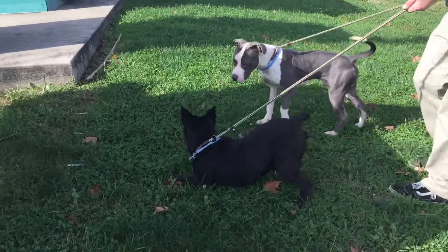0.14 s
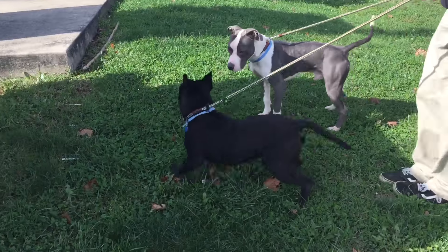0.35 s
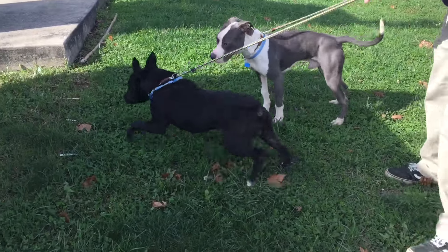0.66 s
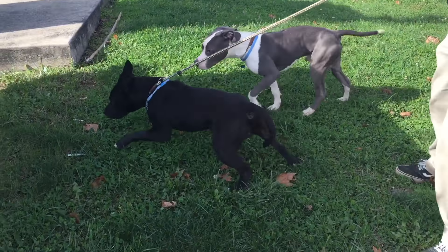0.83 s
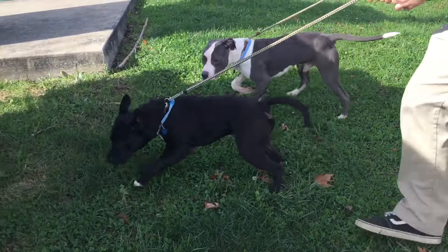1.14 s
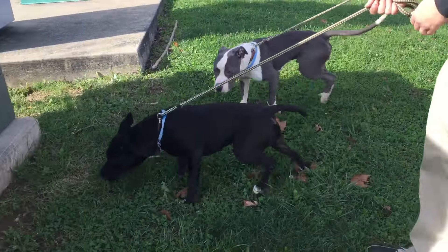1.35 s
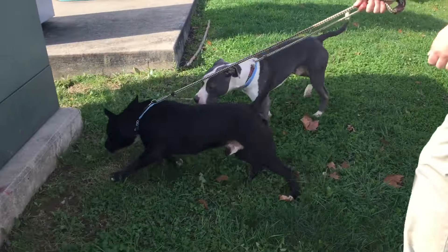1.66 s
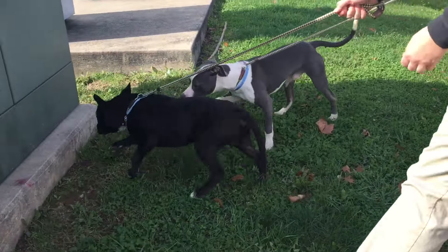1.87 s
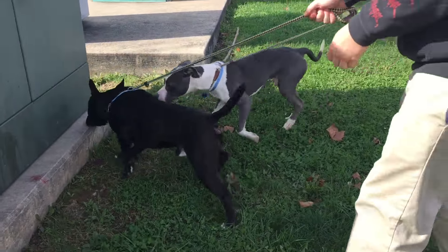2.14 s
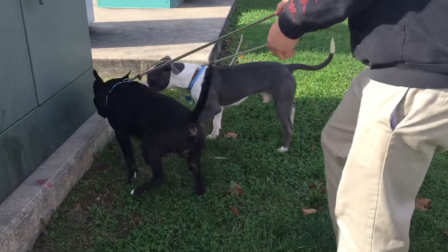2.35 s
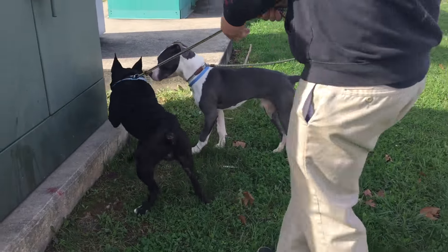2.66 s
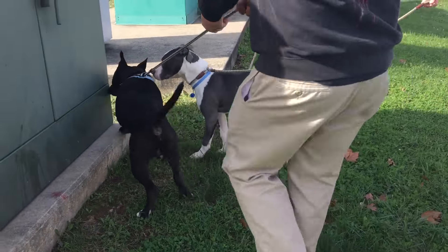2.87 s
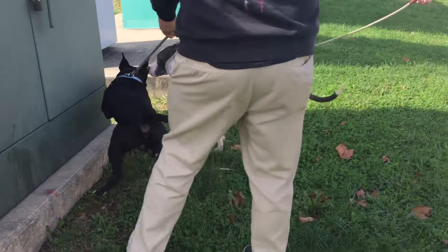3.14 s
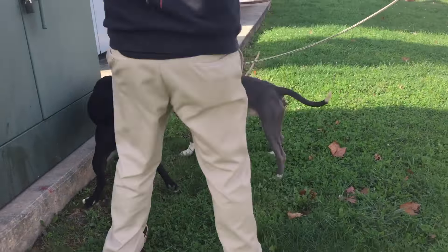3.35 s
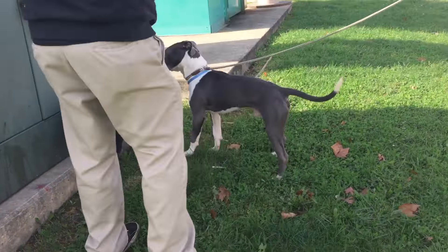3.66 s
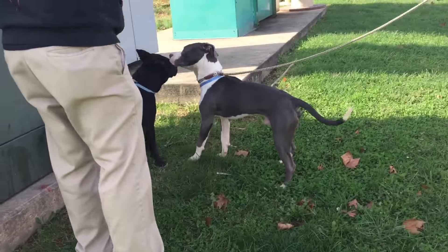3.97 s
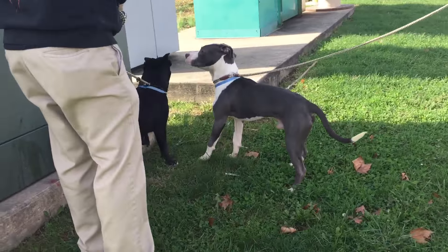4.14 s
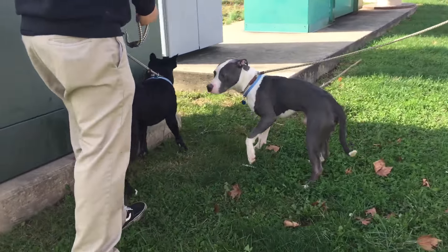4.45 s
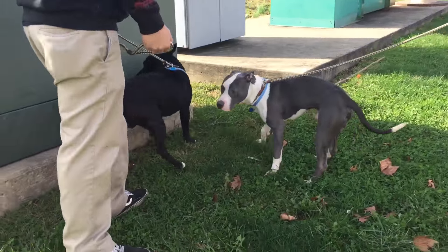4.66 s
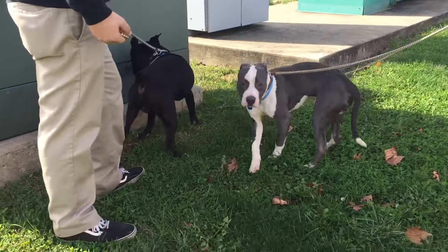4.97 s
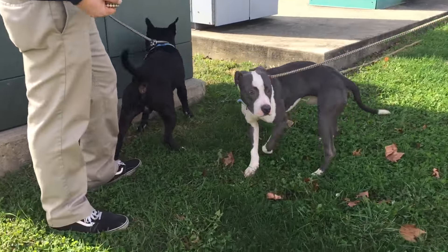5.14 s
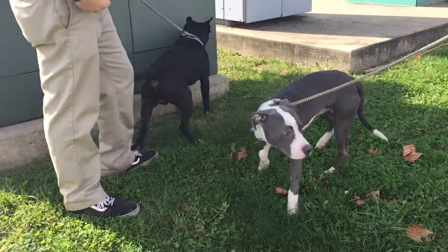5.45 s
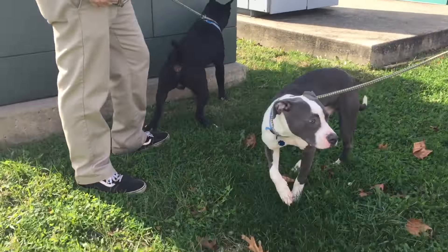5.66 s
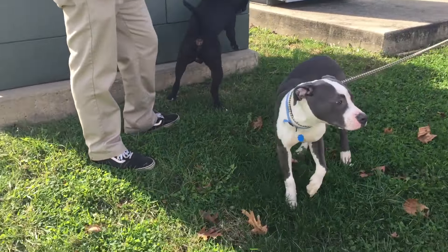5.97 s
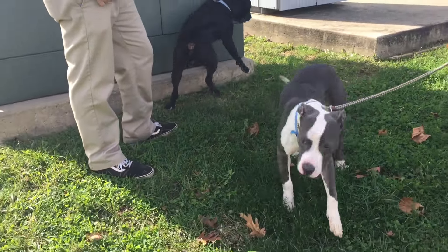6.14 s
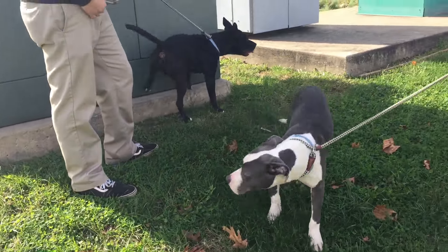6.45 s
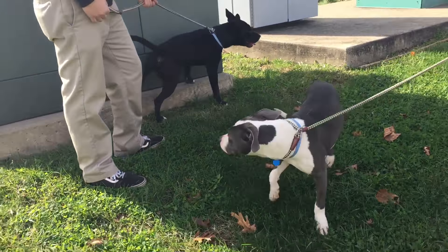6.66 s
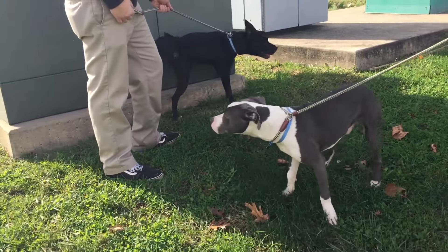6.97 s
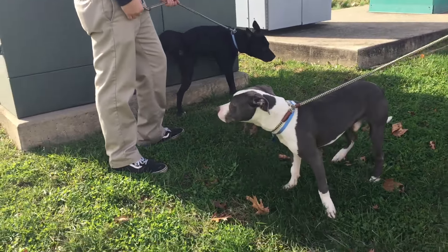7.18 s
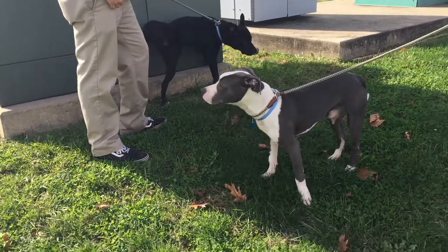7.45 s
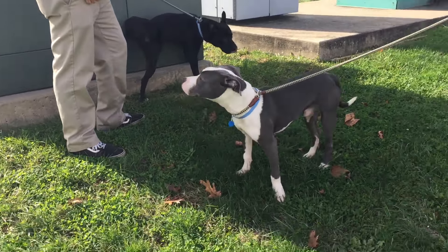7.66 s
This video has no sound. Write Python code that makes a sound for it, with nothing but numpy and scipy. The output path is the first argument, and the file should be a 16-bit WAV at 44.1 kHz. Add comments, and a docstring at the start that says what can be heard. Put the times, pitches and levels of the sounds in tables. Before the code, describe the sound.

A quick flurry of grass rustling and sharp ticks close by, then a deep engine starts across the lawn, revs up within a second and settles slightly lower into a pulsing drone. Another deep hum swells underneath. Far traffic and stirring leaves fill the background, with scattered paw steps, tiny metal chinks, thin faint whistles and one shoe scuff later, all caught by one outdoor microphone.

```python
"""Traffic roars far away and a second machine hums, climbing slowly: band-shaped noise and wavering sines.
Then a big eight-cylinder engine catches some way off across a lawn, revs up and settles to an uneven idle:
orders of its cycle plus pulsing exhaust noise. Close by, paws and shoes rustle in the grass (crackly hiss),
leads tick and collar tags chink (struck modes), leaves stir in a breeze and faint whistles rise."""
import sys
import numpy as np
from scipy import signal
from scipy.fft import rfft, irfft, next_fast_len
from scipy.io import wavfile
from scipy.ndimage import uniform_filter1d, map_coordinates

SR = 44100
rng = np.random.default_rng(int(sys.argv[2]) if len(sys.argv) > 2 else 0)


def waveform_to_disk(signal):
    """Save audio, clipped to [-1, 1], as 16-bit WAV at the path in sys.argv[1]."""
    frames = np.transpose(np.atleast_2d(signal))
    scaled = np.clip(frames, -1, 1) * 32767
    samples = np.round(scaled).astype(np.int16)
    wavfile.write(sys.argv[1], SR, samples)


def rack_gain(trim_db):
    """Turn a fader trim in dB into the linear factor to multiply a signal by."""
    fader = np.asarray(trim_db, float)
    return 10 ** (fader / 20)


N = 344553
T = np.arange(N) / SR


def unit(x):
    """Scaled to rms 1."""
    return x / np.sqrt(np.mean(x ** 2) + 1e-20)


def curves(rows):
    """One value per sample for each column after the time."""
    t_s, *columns = np.transpose(rows)
    return [np.interp(T, t_s, column) for column in columns]


def wobble(rate_hz):
    """A smooth random curve, rate_hz knots a second."""
    knots = rng.standard_normal(int(N * rate_hz / SR) + 4)
    return map_coordinates(knots, [T * rate_hz])


def coloured(x, spectrum):
    """x shaped through the (f/Hz, level/dB) points, straight in log frequency, rms 1."""
    size = next_fast_len(N + 8192)
    f_hz, level_db = np.transpose(spectrum)
    log_bins = np.log(np.fft.rfftfreq(size, 1 / SR) + 1)
    gain_db = np.interp(log_bins, np.log(f_hz), level_db, left=-120, right=-120)
    return unit(irfft(rfft(x, size) * rack_gain(gain_db), size)[:N])


def tone(cycles, rms_db):
    """A sine of the given level along a running count of cycles, random start phase."""
    return np.sqrt(2) * rack_gain(rms_db) * np.sin(2 * np.pi * (cycles + rng.random()))


def ring(f_hz, t60_s, t):
    """One struck mode."""
    return rack_gain(-60 * t / t60_s) * np.sin(2 * np.pi * f_hz * t)


def swell(start_s, length_s):
    """A rounded rise and fall."""
    return np.sqrt(np.clip(1 - (2 * (T - start_s) / length_s - 1) ** 2, 0, 1))


def patchy(depth_db):
    """Noise whose gain drifts in patches of time and frequency."""
    z = signal.stft(rng.standard_normal(N), nperseg=512)[2]
    across_f = uniform_filter1d(rng.standard_normal(z.shape), size=6, axis=0)
    field = uniform_filter1d(across_f, size=12, axis=1)
    return signal.istft(z * rack_gain(depth_db * unit(field)), nperseg=512)[1][:N]


def crackly(share):
    """Hiss with crackles of widely spread size, about 900 a second."""
    struck = rng.random(N) < 900 / SR
    crackle = struck * rng.choice([-1, 1], N) * rack_gain(4.5 * rng.standard_normal(N))
    return patchy(depth_db=2.0) + share * unit(crackle)


# tyre roar level: t/s, level/dB
ROAR_LEVEL = [(0, -41.5), (.65, -46), (1.2, -42), (1.76, -43), (2.3, -38), (2.5, -39), (2.9, -41.5),
              (3.46, -40), (3.75, -42), (5.05, -41.5), (6.05, -40), (6.4, -41.5), (6.9, -39), (7.81, -38)]
# tyre roar spectrum: f/Hz, level/dB per Hz
ROAR_SPECTRUM = [(220, -27), (380, 0), (496, -8), (979, -3.5), (2150, -9), (2830, -16.5), (3450, -16.5),
                 (4930, -31.5), (6000, -40.5), (7800, -62.5), (13200, -120)]


def traffic():
    """Far tyre roar: patchy noise, mostly below 4 kHz."""
    roar_db, = curves(ROAR_LEVEL)
    return rack_gain(roar_db + 0.32 * wobble(5.2)) * coloured(patchy(depth_db=0.92), ROAR_SPECTRUM)


# breeze strength: t/s, level/dB
BREEZE_LEVEL = [(0, -52), (.6, -72.5), (1, -53), (1.8, -64), (2.3, -48), (2.9, -51), (3.3, -51.5),
                (3.8, -53), (4.3, -50), (4.6, -58), (4.95, -54), (5.3, -52.5), (6.5, -54), (7.2, -51),
                (7.81, -52)]
# leaf noise spectrum: f/Hz, level/dB per Hz
LEAF_SPECTRUM = [(1500, -14.5), (2800, -0.5), (4000, -6.5), (6000, -6), (9000, -14.5), (11500, -26),
                 (15600, -32.5)]


def breeze():
    """Leaves in the breeze: patchy hiss that swells and sinks."""
    leaves_db, = curves(BREEZE_LEVEL)
    return rack_gain(leaves_db + 0.8 * wobble(7)) * coloured(patchy(depth_db=2.5), LEAF_SPECTRUM)


# low exhaust noise spectrum: f/Hz, level/dB per Hz
RUMBLE_SPECTRUM = [(30, -27.5), (45, -9.5), (70, -2), (140, 2.5), (220, 0.5), (330, -11), (450, -28.5),
                   (700, -51.5)]
RUMBLE_DB, RUMBLE_WAVER_DB = -34, 3


def exhaust_rumble():
    """The low noisy part of the exhausts, building up at first."""
    build_up_db = -2.6 * np.exp(-T / 0.5)
    level_db = RUMBLE_DB + build_up_db + RUMBLE_WAVER_DB * wobble(2.577)
    return rack_gain(level_db) * coloured(rng.standard_normal(N), RUMBLE_SPECTRUM)


# restless grass between steps: t/s, level/dB
RESTLESS_LEVEL = [(0, -57.5), (1.1, -60.5), (1.6, -53), (2, -56.5), (2.3, -54), (2.66, -54), (2.72, -62),
                  (3, -62.5), (3.35, -54.5), (3.6, -63.5), (4.3, -61), (4.6, -76), (5, -58), (5.4, -68.5),
                  (6.8, -73.5), (7.3, -57), (7.65, -70)]
# paws and shoes brushing through: start t/s, hold/s, level/dB
BRUSHES = [(.12, 0.058, -63), (0.289, .055, -41), (0.339, 0.048, -44), (0.498, 0.014, -56.5),
           (0.571, 0.058, -50), (0.758, 0.066, -54.5), (0.854, 0.049, -61), (0.997, 0.068, -52),
           (1.178, 0.021, -54.5), (1.295, 0.033, -45), (1.529, 0.046, -52), (1.763, 0.034, -57),
           (1.915, 0.023, -59), (2.042, 0.089, -51.5), (2.242, 0.023, -48.5), (2.415, 0.047, -51.5),
           (2.51, 0.12, -53.5), (2.75, 0.03, -55.5), (4.378, 0.014, -43.5), (4.42, .03, -60.5),
           (4.714, 0.033, -64.5), (5.421, 0.011, -55), (6.05, 0.047, -52), (6.125, 0.065, -54.5),
           (6.31, .05, -64.5), (6.879, 0.018, -54), (7.022, 0.018, -58), (7.199, .11, -61),
           (7.352, .08, -59.5)]
# blade noise spectrum: f/Hz, level/dB per Hz
GRASS_SPECTRUM = [(800, -30), (2000, -3.5), (4000, -2), (7000, 2.5), (10300, -2), (13000, -3.5),
                  (15600, -9.5)]
# both scale with hold: a long brush rises and fades more slowly
BEND_SHARE, SPRING_DB_PER_HOLD = 0.37, 17.5


def grass():
    """Blades bend under paws and shoes, then spring back: crackly hiss gated by each brush."""
    restless_db, = curves(RESTLESS_LEVEL)
    level = rack_gain(restless_db + 1.3 * wobble(9))
    for start_s, hold_s, level_db in BRUSHES:
        holds = (T - start_s) / hold_s
        bend = np.clip(holds / BEND_SHARE, 0, 1)
        spring_back = rack_gain(-SPRING_DB_PER_HOLD * np.maximum(holds - 1, 0))
        level = level + rack_gain(level_db) * bend * spring_back
    return level * rack_gain(1.3 * wobble(40)) * coloured(crackly(share=0.75), GRASS_SPECTRUM)


# dragged shoes: t/s, length/s, f/Hz, width/Hz, level/dB at the top of the swell
SHOE_DRAGS = [(0.29, 0.16, 2100, 1400, -46.5), (6.068, .33, 1350, 448.5, -42.5)]


def scuffs():
    """A dragged shoe: crackly noise peaked at a colour of its own."""
    out = np.zeros(N)
    for start_s, length_s, f_hz, width_hz, level_db in SHOE_DRAGS:
        spectrum = [(f_hz - width_hz, -15), (f_hz, 0), (f_hz + width_hz, -10), (3 * f_hz, -40)]
        out += rack_gain(level_db) * swell(start_s, length_s) ** 2 * coloured(crackly(share=0.55), spectrum)
    return out


# faint thin whistles: t/s, length/s, f/Hz at the start, level/dB at the top of the swell
WHISTLE_NOTES = [(3.257, 0.21, 6633, -58), (3.39, .17, 3970, -55.5), (4.997, 0.047, 14590, -66)]


def whistles():
    """Short sines, rising a little."""
    out = np.zeros(N)
    for start_s, length_s, f_hz, level_db in WHISTLE_NOTES:
        cycles = f_hz * (T + 0.037 * (T - start_s) ** 2)
        out += tone(cycles, level_db) * swell(start_s, length_s) ** 2
    return out


# clips and twigs: t/s, level/dB, f/Hz
TICK_HITS = [(0.0797, -43, 4570), (0.2758, -42.5, 5910), (0.3083, -29.5, 4150), (0.3264, -32.5, 4600),
             (0.3874, -26, 5600), (0.5062, -50, 4470), (0.588, -45, 4270), (1.1916, -43.5, 4320),
             (1.297, -38.5, 4863), (1.4967, -39, 4682), (1.556, -37, 6200), (1.5808, -36.5, 4790),
             (2.2538, -32.5, 5420), (2.558, -37, 4020), (3.9064, -35.5, 5620), (4.383, -29.5, 6540),
             (4.7461, -40.5, 4030), (5.4314, -39, 4200), (5.81, -44, 4380), (6.8879, -40.5, 4498),
             (7.0307, -41.5, 4674)]


def ticks():
    """Dry ticks of clips and twigs: one mode and a noise burst, both dead in about 10 ms."""
    out, t = np.zeros(N + SR), np.arange(SR // 10) / SR
    for start_s, level_db, f_hz in TICK_HITS:
        burst = rack_gain(-60 * t / 0.0099) * rng.standard_normal(len(t))
        tick = 0.84 * ring(f_hz, 0.01, t) + 0.29 * burst
        out[round(start_s * SR):][:len(t)] += rack_gain(level_db) * tick
    return out[:N]


# collar tag hits: t/s, level/dB
TAG_HITS = [(0.0378, -64), (0.0818, -47), (1.2734, -39.5), (1.6318, -40), (5.3272, -50), (5.4792, -60),
            (5.667, -62)]
# tag modes: f/Hz, level/dB, t60/s
TAG_MODES = [(13180, 2, .06), (12500, -24, .04), (7900, -2, .03)]


def tag_chinks():
    """Small metal tags: high modes with a soft 1.5 ms onset."""
    out, t = np.zeros(N + SR), np.arange(SR // 10) / SR
    onset = 1 - np.exp(-t / 0.0015)
    chink = onset * sum(rack_gain(mode_db) * ring(f_hz, t60_s, t) for f_hz, mode_db, t60_s in TAG_MODES)
    for start_s, level_db in TAG_HITS:
        out[round(start_s * SR):][:len(t)] += rack_gain(level_db) * chink
    return out[:N]


# second machine, climbing and growing louder: t/s, f/Hz, level/dB
HUM_PITCH = [(0, 57.3, -33), (.4, 57.94, -57), (.7, 57.6, -40), (1.8, 60.24, -35), (2.3, 60.85, -26),
             (2.6, 60.7, -34), (2.9, 61.8, -32), (3.4, 62, -32), (4, 63.9, -36), (4.2, 63.84, -25.5),
             (4.6, 63.6, -29), (4.9, 63.4, -19), (5.2, 63.88, -23.5), (5.4, 63.9, -20), (6.05, 63.75, -18),
             (6.4, 64.6, -31.5), (6.6, 65.23, -19), (7, 65.4, -21.5), (7.3, 65.87, -28.5),
             (7.81, 64.45, -19)]
# thin tone near the firing note: t/s, f/Hz, level/dB
THIN_TONE = [(1.3, 133.4, -70), (1.9, 134.3, -23.5), (2.4, 132.7, -38), (3.5, 137.4, -26.5),
             (3.9, 138, -32), (4.7, 140.7, -43.5), (5.3, 140.3, -29), (6.3, 139.8, -33),
             (7.8, 148.9, -40.5)]
# the octave keeps its own level once it has set in
OCTAVE_DB, OCTAVE_WAVER_DB, OCTAVE_FROM_S = -35, 2.5, 0.54


def hum():
    """The second machine: a note and its octave, with a thin tone beside them."""
    pitch_hz, note_db = curves(HUM_PITCH)
    thin_hz, thin_db = curves(THIN_TONE)
    cycles = np.cumsum(pitch_hz) / SR
    octave = tone(2 * cycles, OCTAVE_DB + OCTAVE_WAVER_DB * wobble(4.5))
    octave_fade_in = np.clip((T - OCTAVE_FROM_S) / 0.3, 0, 1)
    thin = tone(np.cumsum(thin_hz) / SR, thin_db)
    return tone(cycles, note_db) + octave * octave_fade_in + thin


# engine catches, overshoots, sags to idle: t/s, firing note f/Hz
FIRING_NOTE = [(.3, 74.4), (.44, 92.88), (.58, 123.3), (.72, 134.2), (.9, 137.9), (1.2, 141.8),
               (2.3, 141.1), (2.7, 139.4), (3.1, 135.9), (3.5, 131.9), (3.9, 129.9), (4.5, 128.8),
               (4.8, 130.4), (5.1, 133), (5.5, 131.3), (6.3, 132.3), (6.7, 130.8), (7.81, 128.8)]
# throb of the firing note: t/s, level/dB
FIRING_LEVEL = [(.32, -29.5), (.38, -40), (.44, -21.5), (.52, -17), (.59, -23), (.65, -18), (.71, -27.5),
                (.8, -21.5), (.95, -27), (1.1, -23.5), (1.2, -13), (1.35, -14), (1.5, -23), (1.9, -25.5),
                (2.1, -13.5), (2.35, -16), (2.5, -20.5), (2.7, -11.5), (2.9, -20.5), (3, -11), (3.2, -11.5),
                (3.4, -17.5), (3.55, -10), (3.8, -23.5), (4.13, -12), (4.3, -22), (4.42, -14.5),
                (4.68, -14), (4.78, -49.5), (4.88, -18.5), (5, -12.5), (5.2, -17.5), (5.38, -29.5),
                (5.5, -19.5), (5.7, -16.5), (5.8, -41), (5.9, -18), (6.2, -20.5), (6.33, -14.5),
                (6.42, -18), (6.53, -44), (6.7, -24), (7, -25.5), (7.13, -19), (7.4, -27.5), (7.5, -21),
                (7.6, -19), (7.7, -26), (7.81, -31)]
# engine load: t/s, load/dB
ENGINE_LOAD = [(.4, 0.5), (1.1, 2), (1.45, -2.5), (1.8, 3), (2.15, -3.5), (2.85, 7), (3.3, 10.5),
               (3.6, 6.5), (3.9, -0.5), (4.6, 3.5), (4.95, -0.5), (6, 3.5), (7.05, -1.5), (7.8, -6)]
# other orders: order, level/dB at idle, slope/dB per dB of load, slope/dB per Hz of firing note above idle
CYCLE_ORDERS = [(3, -46, 1, 1.1), (4, -48, 0.5, .1), (6, -38.5, -0.27, .1), (7, -39.5, -2.1, 0.7),
                (9, -40.5, 1.17, 0.06), (10, -44.5, 1.7, 1.08), (12, -34.5, 0.64, -.6),
                (13, -41.5, 1.1, -0.27), (14, -50.5, .6, 0.8), (15, -52.5, 1.1, -0.07),
                (17, -51, 0.5, -0.04), (18, -51, 0.77, -0.2), (19, -42.5, 0.39, -0.5),
                (20, -48, 0.25, 0.19), (21, -55.5, 0.7, -0.04), (22, -66, 1.85, -0.66),
                (24, -69, 1.08, 0.43)]
# orders that swell in their own time: t/s, order 5 level/dB, order 11 level/dB, order 16 level/dB
OWN_TIME_ORDERS = [(.4, -41, -42, -60), (.8, -33.5, -38, -45), (1.15, -29, -38, -46), (1.45, -36, -45, -38),
                   (1.8, -24, -32, -34.5), (2.5, -23.5, -29, -38), (2.899, -25.5, -23, -34.5),
                   (3.25, -26, -28, -45), (3.7, -33.5, -28, -52), (4.25, -27, -33, -53),
                   (4.55, -29.5, -26, -43), (4.8, -31.5, -23, -40), (4.951, -28, -36, -38.5),
                   (5.3, -35.5, -35, -37), (5.65, -28.5, -35, -38), (6.2, -38.5, -32, -38),
                   (6.7, -31.5, -40, -43), (7.051, -36, -40, -37), (7.799, -44.5, -39, -37)]
# exhaust gas noise spectrum: f/Hz, level/dB per Hz
RASP_SPECTRUM = [(250, -36), (380, -0.5), (600, 1), (900, -4), (1600, -13), (2500, -47.5)]
IDLE_HZ = 131  # firing note
WAVER_DB, WAVER_KNOTS_HZ = 3, 4.5  # each order comes and goes on its own
COLD_DB, WARM_S = -18, 0.36  # table orders above the firing note start weak and fill in
RASP_DB, RASP_DB_PER_LOAD_DB = -49.5, 0.28  # level at zero load


def engine():
    """Uneven cylinders put lines on multiples of the cycle; the firing note, order 8, leads."""
    (firing_hz,), (firing_db,), (load_db,) = curves(FIRING_NOTE), curves(FIRING_LEVEL), curves(ENGINE_LOAD)
    cycles = np.cumsum(uniform_filter1d(firing_hz, size=SR // 12)) / SR / 8
    above_hz = np.maximum(firing_hz - IDLE_HZ, -12)
    cold_db = COLD_DB * np.exp(-np.maximum(T - 0.4, 0) / WARM_S)
    caught = np.clip((T - 0.27) / 0.011, 0, 1)

    def unsteady(order):
        """Cycles of one order, its phase wandering a little."""
        return order * cycles + 0.034 * wobble(14)

    lines = tone(unsteady(8), firing_db + 0.5 * wobble(7))
    for order, idle_db, by_load, by_speed in CYCLE_ORDERS:
        level_db = idle_db + by_load * load_db + by_speed * above_hz
        level_db = level_db + (order > 8.5) * cold_db + WAVER_DB * wobble(WAVER_KNOTS_HZ)
        lines += tone(unsteady(round(order)), level_db)
    for order, level_db in zip([5, 11, 16], curves(OWN_TIME_ORDERS)):
        lines += tone(unsteady(order), level_db + wobble(7))
    puffs = 1 + 0.3 * np.cos(2 * np.pi * 8 * cycles)  # one per firing
    rasp_level = rack_gain(RASP_DB + RASP_DB_PER_LOAD_DB * load_db)
    rasp = rasp_level * puffs * coloured(rng.standard_normal(N), RASP_SPECTRUM)
    return caught * (lines + rasp)


def scene():
    """Everything reaches one microphone in the open."""
    background = traffic() + breeze() + exhaust_rumble()
    nearby = grass() + scuffs() + whistles() + ticks() + tag_chinks()
    return (background + nearby + hum() + engine())[None]


def top_cut(x):
    """Nothing passes above the cut-off."""
    return signal.sosfilt(signal.butter(12, 15680, fs=SR, output="sos"), x)


# response of the microphone port, with dips: f/Hz, level/dB
PORT_RESPONSE = [(20, 1.5), (4300, 0), (5000, -2.5), (5800, -2), (7000, -4.5), (7700, -5.5), (8600, -3),
                 (9600, -2.5), (10300, -7), (11300, -3), (22000, -3)]


def record(dry):
    """The microphone adds its own noise; its port colours the treble, overall level kept."""
    hiss = rack_gain(-75.5) * rng.standard_normal(N)
    heard = coloured(dry[0] + hiss, PORT_RESPONSE) * np.std(dry)
    return top_cut(heard[None])


dry = scene()
out = record(dry)
waveform_to_disk(out)
```